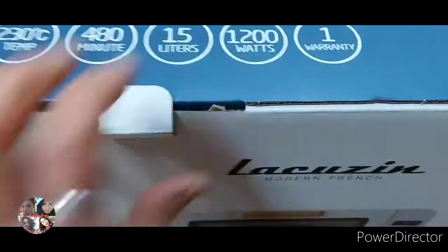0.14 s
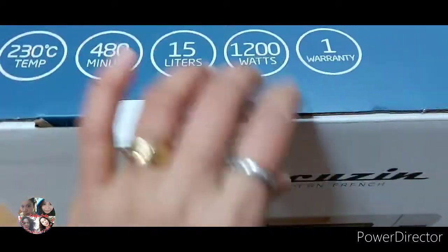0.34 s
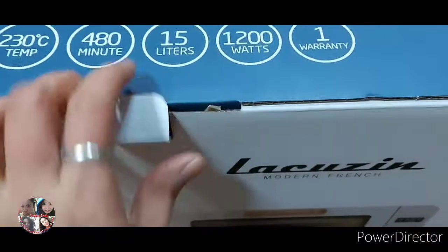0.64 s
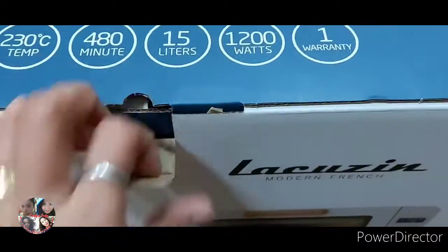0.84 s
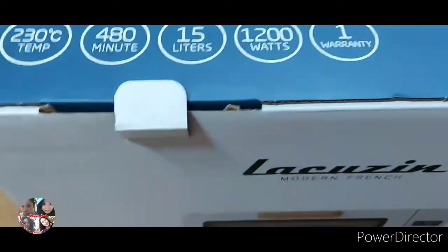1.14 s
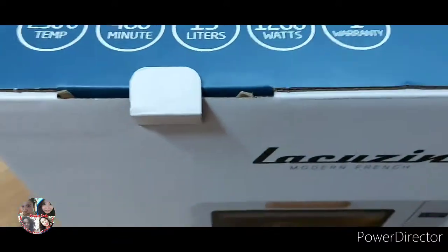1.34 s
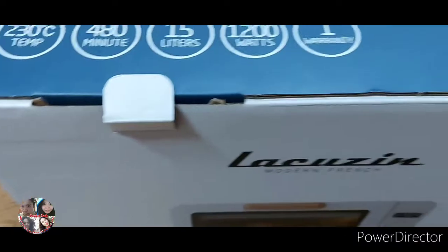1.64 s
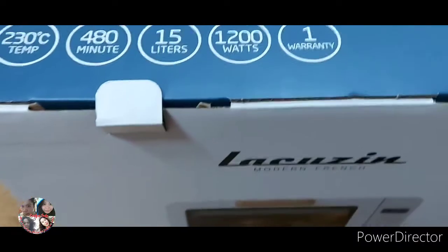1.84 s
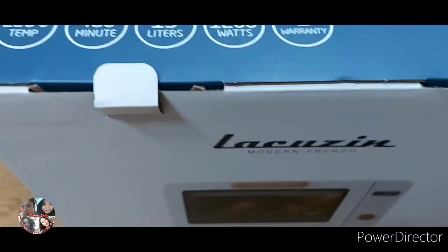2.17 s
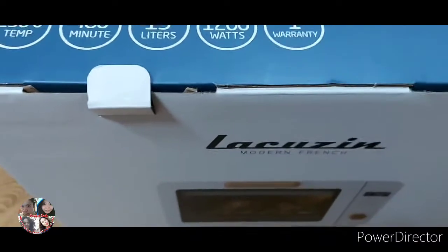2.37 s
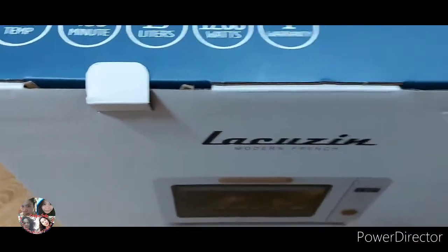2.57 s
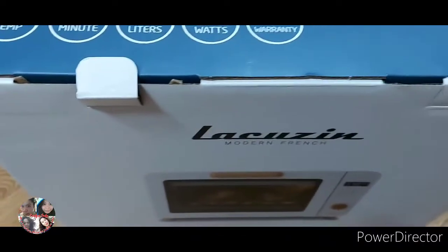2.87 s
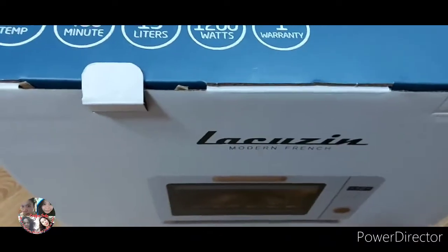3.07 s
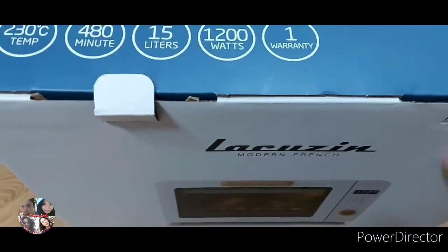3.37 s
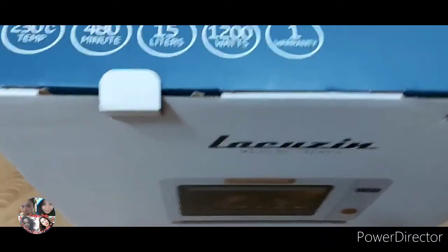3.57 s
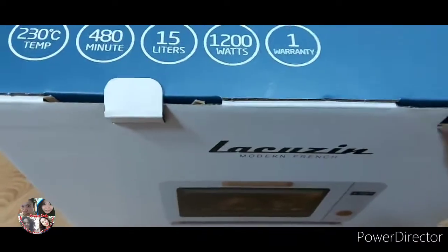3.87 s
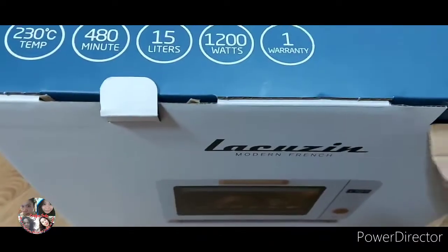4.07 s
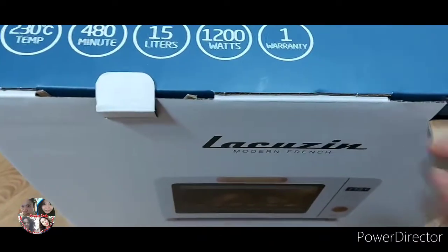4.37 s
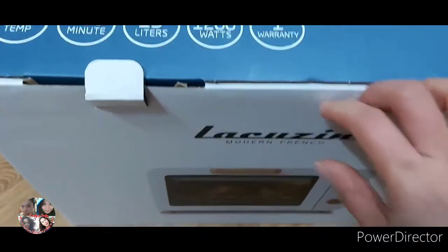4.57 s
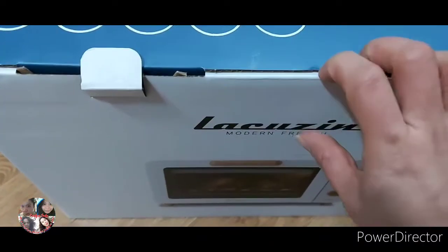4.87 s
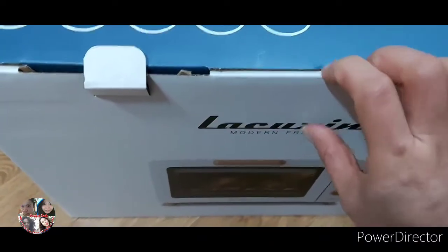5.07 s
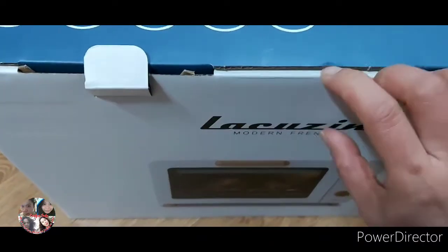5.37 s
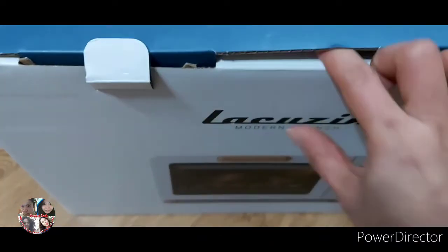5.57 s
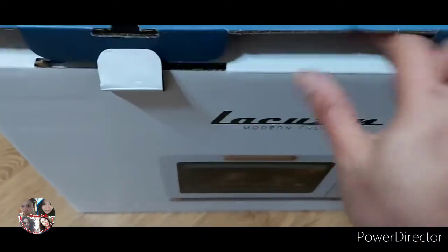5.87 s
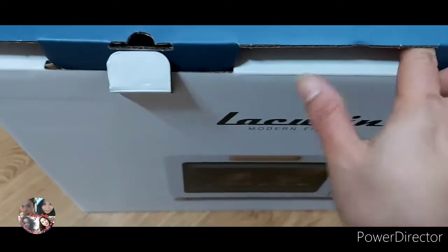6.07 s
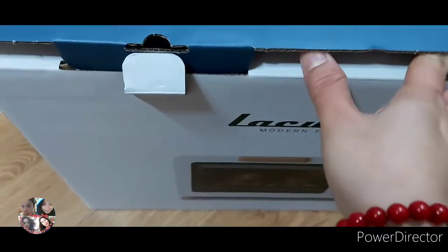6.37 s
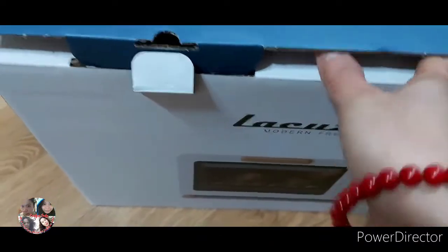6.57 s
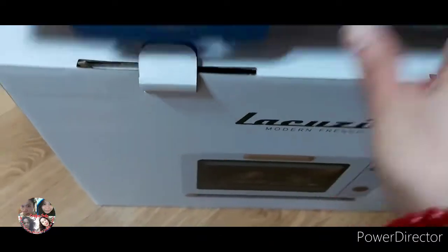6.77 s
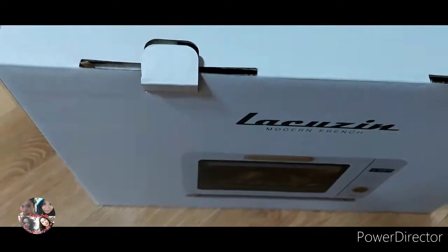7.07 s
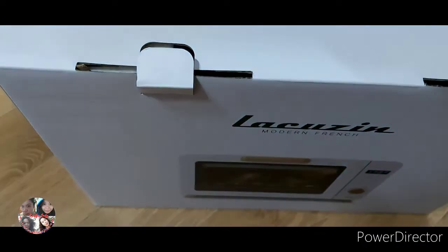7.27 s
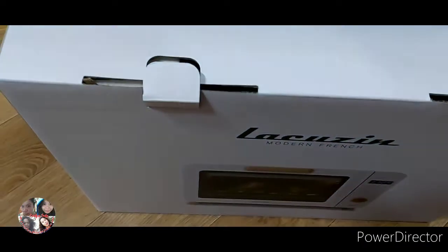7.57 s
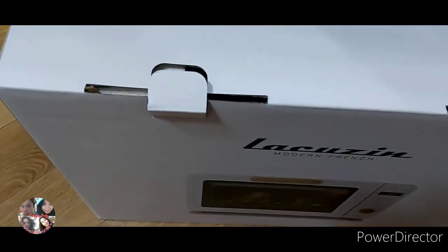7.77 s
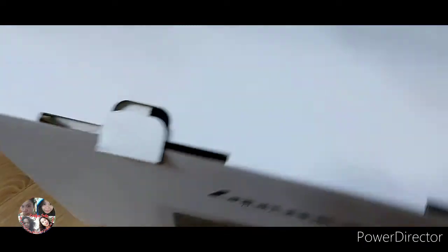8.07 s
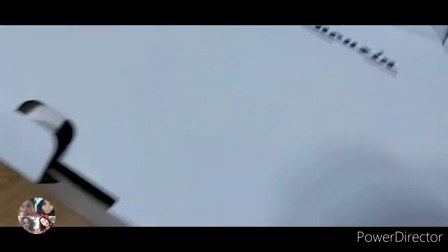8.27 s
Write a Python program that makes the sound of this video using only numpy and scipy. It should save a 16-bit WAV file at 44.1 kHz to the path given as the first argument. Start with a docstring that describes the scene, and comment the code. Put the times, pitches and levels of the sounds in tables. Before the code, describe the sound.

Close, irregular scraping, rustling and hollow knocks of a cardboard box being opened, with sharp snaps as its tabs come loose.

```python
"""A hand scrapes and knocks on a large corrugated cardboard box, close by in a small room.
Two locking tabs are prised out and snap free, then the lid is pulled up and its flap drags along a wall.
Sliding card hisses in tiny slips; coarser stick-slip shakes the panels and rings the hollow box.
Each snap is a volley of breaking fibres that also knocks the panel and thumps the box."""
import sys
import numpy as np
from scipy import signal
from scipy.fft import rfft, irfft
from scipy.io import wavfile

SR = 44100
rng = np.random.default_rng(int(sys.argv[2]) if len(sys.argv) > 2 else 0)


def log_audio(samples):
    """Write samples as a 16-bit WAV file to the path given in sys.argv[1]."""
    # one column per channel
    frames = np.atleast_2d(samples).T
    # limit to full scale, then quantise
    limited = np.clip(frames, -1, 1)
    pcm = np.round(limited * 32767).astype(np.int16)
    wavfile.write(sys.argv[1], SR, pcm)


N = 371763
TIME = np.arange(N) / SR
TOP_HZ = 15700


def undb(db):
    return 10 ** (np.asarray(db) / 20)


def unit_rms(x):
    return x / np.sqrt(np.mean(x ** 2))


def unit_energy(x):
    return x / np.sqrt(np.mean(np.sum(x ** 2, axis=-1)))


def curves(table):
    """Rows of (time [s], values...) to one per-sample curve per value."""
    times, *columns = np.transpose(table)
    return [np.interp(TIME, times, column) for column in columns]


def on_log_axis(hz, points):
    """Interpolate (frequency [Hz], value) rows over log frequency."""
    f, value = np.transpose(points)
    return np.interp(np.log(hz + 1), np.log(f), value)


def response(spectrum, size=4096):
    """Minimum-phase impulse response of a spectrum."""
    gain = undb(on_log_axis(np.fft.rfftfreq(size, 1 / SR), spectrum))
    cepstrum = irfft(np.log(gain))
    cepstrum[1:size // 2] *= 2
    cepstrum[size // 2 + 1:] = 0
    return unit_energy(irfft(np.exp(rfft(cepstrum))))


def through(x, ir):
    """Convolve, keeping the input length."""
    return signal.fftconvolve(np.atleast_2d(x), np.atleast_2d(ir), axes=-1)[:, :x.shape[-1]]


def band(x, hz, width_hz):
    """One resonance."""
    return signal.lfilter(*signal.iirpeak(hz, hz / width_hz, fs=SR), x)


def zero_phase(x, hz, kind):
    return signal.sosfiltfilt(signal.butter(2, hz, kind, fs=SR, output="sos"), x)


def blend(a, b, db):
    """Constant-power mix, b above a by db."""
    return (unit_rms(a) + undb(db) * unit_rms(b)) / np.sqrt(1 + undb(2 * db))


def wander(rate_hz):
    """Slow random curve, spread near 1."""
    knots = rng.standard_normal(N // 50)
    return 1.14 * np.interp(TIME * rate_hz, np.arange(len(knots)), knots)


def pan(db):
    """Constant-power gains, left above right by db."""
    gains = undb(np.array([db, -db]) / 2).reshape(2, -1)
    return gains / np.sqrt(np.mean(gains ** 2, axis=0))


def two_ports(pair, apart_hz=900, bass_side_db=-17):
    """Two unrelated signals as a stereo pair, alike in the bass."""
    treble = zero_phase(pair[1], apart_hz, "high")
    side = treble + undb(bass_side_db) * (pair[1] - treble)
    return np.array([pair[0] + side, pair[0] - side])


def stereo_noise(size):
    return two_ports(rng.standard_normal((2, size)))


def add(out, at_s, sound):
    start = max(int(at_s * SR), 0)
    out[:, start:start + sound.shape[1]] += sound[:, :N - start]


# Room background: (frequency [Hz], density [dB])
ROOM_TONE_SPECTRUM = [(20, -28.5), (45, -9.5), (70, 2), (120, -11.5), (175, 0.5), (290, -7.5), (400, -10),
                      (600, -12), (1000, -13.5), (1800, -24.5), (6000, -14), (15500, -26.5)]
def room_tone(level_db=-69):
    """Faint steady noise of the room."""
    return undb(level_db) * unit_rms(through(stereo_noise(N), response(ROOM_TONE_SPECTRUM)))


# Slides of skin or card over card, before the trims in sliding() and rubbing(): (start [s], swell [s],
# hold [s], hiss [dB], brightness [dB], panel rub [dB], hardness [dB], flex [dB], left-right [dB])
SLIDES = [ (0.0, 0.015, 0.013, -34, 1.5, -29.5, -1, -32, -1.5),
          (0.197, .02, 0.56, -80, 0.5, -75.5, 1, -68, -8.5),
          (0.674, .02, .05, -57, 2, -55.5, -7, -68.5, -1),
          (0.732, .03, .04, -53.5, -2, -55.5, 1.5, -69, -1),
          (0.805, 0.069, 0.024, -45, -4, -38.5, -1.5, -46, -1),
          (0.91, .015, 0.069, -47, -4, -45, 2.5, -58, -3), (1.005, .015, .06, -44.5, 4, -46, 3, -44, -1),
          (1.34, 0.05, 0.12, -58.5, 4, -67.5, -3, -60, 1),
          (1.511, .04, 0.092, -57, -1, -60.5, -8.5, -59, -0.5),
          (1.642, 0.061, .1, -50, 6, -63.5, 9, -61.5, 6), (1.808, 0.048, 0.1, -50.5, 7, -69.5, 10, -62, 6),
          (1.956, 0.017, .02, -51, 2.5, -59.5, -9, -53.5, 4),
          (2.08, .05, 0.064, -51.5, 2.5, -63.5, 3.5, -53, 0),
          (2.172, 0.021, 0.15, -60.5, 6, -59, 7.5, -58.5, -6),
          (2.4, 0.1, 0.065, -57.5, 4.5, -61, -3, -53.5, -7), (2.598, 0.049, .03, -66, 7, -68, 4, -66, 3.5),
          (2.72, .16, .06, -62.5, 14.5, -70.5, 10, -76, 6),
          (2.945, 0.011, 0.061, -56.5, 3.5, -56.5, -2.5, -52.5, 2.5),
          (3.016, 0.097, 0.099, -62, 0.5, -75, -3, -80, 5),
          (3.165, .015, .015, -72, 4, -55.5, -9.5, -65, 2),
          (3.256, 0.032, 0.054, -48.5, -14, -49, 3, -60, 0),
          (3.33, 0.011, 0.055, -47, -15, -46, 0.5, -46.5, -2),
          (3.41, 0.017, .015, -43, -4, -41.5, 1, -47, 0), (3.447, 0.013, .06, -48.5, 0, -47.5, 3, -53.5, 1),
          (3.524, .012, 0.037, -30, 4, -27.5, -4.5, -38, 0),
          (3.711, .02, 0.0063, -48.5, 2, -58, -10, -65, 3.5),
          (3.851, 0.018, 0.006, -42.5, 3.5, -45.5, -8.5, -56, 2),
          (3.944, 0.013, .04, -48, 7, -49.5, 3.5, -44, 2), (4.008, 0.03, .015, -43, 1.5, -48.5, -5, -68, 2),
          (4.075, 0.023, .1, -56.5, 1, -55, -2.5, -57, 4),
          (4.187, 0.013, .015, -65, -1, -40.5, -13.5, -46, 5),
          (4.234, 0.028, .004, -43.5, 1, -43.5, 2.5, -69, -0.5),
          (4.431, 0.056, .015, -49.5, 15, -59, 1.5, -73.5, 5.5),
          (4.53, 0.034, .08, -60, 3, -76, -4.5, -80, 1), (4.697, .03, 0.034, -56, 1, -51.5, 3, -60, 8),
          (4.802, .04, 0.014, -50, 8.5, -54, 0.5, -72, 7),
          (4.897, .025, .025, -60, -2.5, -60, -2.5, -66, 2),
          (4.961, .03, .16, -81, 13, -66, -8, -73.5, 10.5), (5.19, .05, .03, -84, 0.5, -59, -18, -76.5, 4),
          (5.281, 0.016, 0.015, -60, 0, -47.5, -4.5, -51, 3),
          (5.35, .025, 0.0057, -54, 6, -54.5, -11, -52, 7), (5.468, 0.14, .13, -41.5, 2, -43.5, 1, -51, 4),
          (5.592, .05, 0.03, -42.5, -11, -36.5, -1, -47.5, 0),
          (5.728, .02, .02, -35.5, 2.5, -44.5, -0.5, -53, 0),
          (5.855, .008, 0.045, -42.5, -10, -32, -7, -52, -5),
          (5.912, .025, 0.03, -24.5, 4, -27.5, -1, -35, 2.5),
          (5.995, 0.016, .055, -41, 2, -38, -2.5, -52, 4), (6.15, .012, 0.035, -44, 4, -41, -0.5, -52, 5),
          (6.194, .02, 0.076, -49, 2, -47, -3, -48.5, 1.5), (6.31, 0.017, .005, -47.5, 1, -46.5, 3, -48, 3),
          (6.41, 0.023, 0.018, -49.5, 0, -45, -4.5, -53, 5),
          (6.49, .015, 0.023, -49.5, -1, -49.5, 10, -55, 3),
          (6.548, 0.023, .01, -49.5, 2, -50.5, 11, -59, 6),
          (6.623, 0.034, 0.017, -46, -1.5, -48, 4.5, -56, 3),
          (6.707, 0.062, 0.018, -50, 10.5, -53, -1, -54.5, 4),
          (6.833, 0.042, 0.031, -34.5, 3, -35.5, 0.5, -55, 1.5),
          (6.917, 0.026, .055, -33.5, 3.5, -44.5, -2, -46.5, 1),
          (7.072, .03, 0.042, -35, 3.5, -35.5, 3.5, -35, 1), (7.225, 0.05, .01, -36, 4.5, -38.5, 1, -57, 2),
          (7.361, 0.026, 0.0056, -42, 11, -40, -1, -48, 2), (7.432, 0.055, .03, -46, 8, -54, 2.5, -55, 1),
          (7.503, 0.032, 0.046, -37, 9.5, -35.5, -0.5, -39.5, -1),
          (7.587, 0.077, .035, -36, 6, -47.5, 3, -51, -0.5),
          (7.78, 0.016, .005, -36, 8.5, -42.5, -2.5, -53, 0),
          (7.829, 0.012, 0.068, -37, 10, -43.5, 4, -58, 1),
          (7.968, 0.015, 0.019, -43, 7, -40.5, 5.5, -58.5, -1),
          (7.992, 0.027, 0.23, -44.5, 8, -46.5, 4.5, -49, 1),
          (8.091, 0.098, 0.044, -32.5, 7, -43.5, 5.5, -54, 4),
          (8.223, .06, .14, -30, -0.5, -38, 3.5, -40.5, 2)]
def slide_controls(swell_power=0.89, sag_db_per_s=12.5, release_db_per_s=301):
    """Each slide gathers speed, tires and stops; in overlaps the louder sets colour and side."""
    t = TIME[::64]
    columns = np.transpose(SLIDES)[:, :, None]
    start_s, swell_s, hold_s, hiss_db, bright_db, rub_db, hard_db, flex_db, pan_db = columns
    held_s = np.maximum(t - start_s - swell_s, 0)
    drop_db = sag_db_per_s * held_s + release_db_per_s * np.maximum(held_s - hold_s, 0)
    speed = np.clip((t - start_s) / swell_s, 0, 1) ** swell_power * undb(-drop_db)

    def combine(level_db, *colours):
        power = (speed * undb(level_db)) ** 2 + 1e-14
        total = power.sum(0)
        means = [(power * colour).sum(0) / total for colour in colours]
        return curves(np.transpose([t, 10 * np.log10(total), *means]))
    return combine(hiss_db, bright_db, pan_db), combine(rub_db, hard_db) + combine(flex_db)


def slips(rate_hz, spread_db):
    """Irregular slips of very uneven size, on two channels."""
    happens = rng.random(N) < rate_hz / SR
    sizes = undb(spread_db * np.minimum(rng.exponential(size=N), 4))
    return unit_rms(happens * sizes * rng.standard_normal((2, N)))


def snag_gain(rate_hz, spread_db, fade_s, db):
    """Gain of a steady rub plus brief spurts as the card snags and releases."""
    spurt = np.exp(-np.arange(256) / SR / fade_s)
    power = through(slips(rate_hz, spread_db)[0] ** 2, spurt)
    return np.hypot(1, undb(db) * unit_rms(np.sqrt(abs(power))))


def flicker(x, depth_db, rate_hz, octaves=5):
    """Each octave wavers on its own as the contact patch changes."""
    out, rest = 0, x
    for hz in TOP_HZ / 2. ** np.arange(octaves, 0, -1):
        low = zero_phase(rest, hz, "low")
        out = out + low * undb(depth_db * wander(rate_hz))
        rest = rest - low
    return out + rest * undb(depth_db * wander(rate_hz))


def flap_bounces(x, db, fade_s, move_hz=14.0, count=4, size=2048):
    """Add early bounces off flaps and walls; the pattern shifts as the contact moves."""
    fade = np.exp(-np.arange(size) / SR / fade_s)
    paths = [through(x, unit_energy(stereo_noise(size) * fade)) for _ in range(count)]
    shares = np.array([wander(move_hz) for _ in range(count)])
    shares = shares / np.sqrt(np.sum(shares ** 2, axis=0))
    return x + undb(db) * sum(share * path for share, path in zip(shares, paths))


# Fibre hiss: (frequency [Hz], density [dB])
HISS_SPECTRUM = [(600, -41.5), (1400, -5.5), (2000, -5.5), (2800, -0.5), (4000, 0.5), (5500, 0.5),
                 (8000, -0.5), (11000, -1), (15500, -4)]
def sliding(level_db, bright_db, pan_db, catch_db=1.48, catch_hz=70, split_hz=5500):
    """Paper fibres brush past each other; the contact catches and lets go."""
    contact = rng.standard_normal((2, N))
    contact *= snag_gain(rate_hz=930, spread_db=2.5, fade_s=0.00072, db=-1.5)
    contact = flicker(two_ports(contact), depth_db=2.5, rate_hz=45)
    contact *= undb(catch_db * wander(catch_hz))
    hiss = flap_bounces(through(contact, response(HISS_SPECTRUM)), db=1.0, fade_s=0.0024)
    dull = zero_phase(hiss, split_hz, "low")
    return blend(dull, hiss - dull, bright_db) * undb(level_db - 1.0) * pan(pan_db + 1.9)


# Modes of the hollow box: (frequency [Hz], width [Hz], gain [dB])
BOX_MODES = [(169, 22, -7), (319, 11, -8), (385, 40, 5.5), (600, 30, -5.5), (697, 84, 3), (786.6, 43, 0.5),
             (1033, 24, -8), (1107, 45, -10.5), (1373, 59, -2.5), (1680, 36, -12)]
def rubbed_box(x, waver_db=5.5, waver_hz=6.4):
    """Each mode takes more or less of the rub as the contact crosses the panel."""
    return sum(undb(db + waver_db * wander(waver_hz)) * band(x, hz, width_hz)
               for hz, width_hz, db in BOX_MODES)


def struck_box(size=4096):
    """Impulse response of the damped box modes."""
    t = np.arange(size) / SR
    modes = (undb(db) * width_hz * np.exp(-np.pi * width_hz * t) * np.cos(2 * np.pi * hz * t)
             for hz, width_hz, db in BOX_MODES)
    return unit_energy(sum(modes))


# Finger pad on card: (frequency [Hz], density [dB])
PAD_SPECTRUM = [(110, -35.5), (180, 3.5), (300, 1.5), (390, 2), (500, -6), (700, -18.5), (1500, -51)]
# Nail or cut edge on card: (frequency [Hz], density [dB])
EDGE_SPECTRUM = [(300, -30.5), (560, 0.5), (750, 3.5), (1050, -2), (1400, -4.5), (1800, -7), (2600, -12.5),
                 (8000, -54.5)]
# Hollowness of the rub: (time [s], box ring re panel shake [dB])
HOLLOWNESS = [(0, -12), (1.8, -24), (2.3, -1.5), (3.3, -9), (4.3, 11), (5.15, 12), (5.65, -1.5), (5.9, 18),
              (6.3, 3.5), (6.9, -10.5), (8.4, -18)]
# Rumble of the flexing box: (frequency [Hz], density [dB])
FLEX_SPECTRUM = [(18, -32.5), (35, -15.5), (58, 1), (80, 4), (115, -1), (170, -3.5), (240, -18), (400, -33),
                 (1500, -45)]
def rubbing(rub_db, hard_db, flex_db, grain_db=-2.0, catch_db=2.5, catch_hz=45):
    """Coarse stick-slip shakes the panels and rings the box, which flexes and rumbles."""
    contact = rng.standard_normal((2, N)) + undb(grain_db) * slips(rate_hz=350, spread_db=3.0)
    contact = two_ports(contact) * undb(catch_db * wander(catch_hz))
    # the cut edge jumps over the flutes
    rasp = unit_rms(snag_gain(rate_hz=110, spread_db=3.5, fade_s=0.0012, db=-5.0))
    contact = flap_bounces(contact * rasp, db=-6.0, fade_s=0.005)
    pad = through(contact, response(PAD_SPECTRUM))
    edge = through(contact, response(EDGE_SPECTRUM))
    shake = blend(pad, edge, hard_db)
    panels = blend(shake, rubbed_box(shake), curves(HOLLOWNESS)[0])
    push = rng.standard_normal(N) + undb(-6.5) * rng.standard_normal((2, N))
    rumble = unit_rms(through(push, response(FLEX_SPECTRUM))) * np.hypot(undb(flex_db), wall_sways())
    return panels * undb(rub_db - 1.0) * pan(0.9) + rumble * pan(2.1)


# Breaking fibres: (frequency [Hz], density [dB])
CRACK_SPECTRUM = [(500, -12), (1300, 1), (2200, -1), (3500, -4.5), (5500, -3.5), (7500, -6.5), (11000, -5),
                  (15500, 0)]
# Knocked panel: (frequency [Hz], density [dB])
PANEL_SPECTRUM = [(100, -23.5), (220, 8), (400, 0.5), (750, -0.5), (1100, 1), (1600, -3.5), (3000, -7),
                  (8000, -43.5)]
# Thumped box: (frequency [Hz], density [dB])
THUD_SPECTRUM = [(20, -36), (38, -22), (58, -9), (90, -4), (125, -7.5), (175, 4), (280, -3.5), (450, -24),
                 (2000, -62.5)]
# Snaps, creases and bumps: (time [s], fade [ms], crack [dB], crack pitch [Hz], knock [dB],
# knock pitch [Hz], thud [dB], crack left-right [dB])
BLOW_EVENTS = [(0.012, 2.2, -58, 5500, -34, 350, -27.5, 0), (0.0234, 2.2, -24.5, 4870, -27, 900, -34, -1.5),
               (0.029, 7.2, -44, 4600, -25.5, 950, -34, 7), (0.208, 1, -53, 4050, -54.5, 460, -88, -16),
               (0.8133, 5.7, -39.5, 7500, -37, 273, -37.5, -4), (0.8513, 4, -40.5, 3880, -45, 557, -48, -2),
               (0.871, 3.5, -37.5, 3380, -42.5, 546, -50, 7), (0.9185, 6.2, -39, 7000, -40.5, 300, -59, -1),
               (1.009, 4.2, -28.5, 6170, -29.5, 844, -63, 0), (1.064, 2.5, -42.5, 5920, -42, 398, -57, 2.5),
               (1.0798, 4.2, -34, 5730, -27, 760, -35.5, 14.5),
               (1.0841, 3.2, -24, 5440, -42.5, 710, -45, -1),
               (1.3389, 1.2, -51.5, 4400, -55.5, 363, -53.5, -12),
               (1.913, 1.1, -52, 5900, -57, 890, -72, -2), (1.969, 0.59, -47, 5200, -57, 960, -65, 4),
               (2.144, 2, -49, 4930, -53.5, 380, -52, -10), (2.178, 1.9, -51.5, 4000, -55, 500, -66, -4),
               (2.548, 2.5, -57, 4500, -57.5, 453, -54, 13), (2.6132, 1, -55, 6100, -64, 400, -60, 13),
               (3.2427, 9.9, -48, 6500, -55, 736, -65, 7), (3.2703, 5.7, -45, 3550, -50, 610, -70, 5),
               (3.322, 2.5, -45, 4940, -49.5, 600, -61, 2.5), (3.336, 0.8, -27, 6460, -47, 434, -61, 5),
               (3.401, 3.1, -38, 4400, -39.5, 690, -64, 2), (3.376, 2, -43, 7100, -53.5, 701, -65, 7.5),
               (3.4225, 1.1, -34, 7540, -43, 880, -63, 12), (3.448, 2, -42.5, 6000, -50.5, 700, -62, 9.5),
               (3.505, 4.1, -24.5, 7750, -44, 920, -62, 9), (3.5417, 5.5, -16.5, 6580, -26.5, 426, -38, 5),
               (3.554, 8.3, -46, 6100, -29, 332, -27, -7), (3.9502, 2.4, -47.5, 6900, -46, 320, -33.5, 5),
               (4.082, 5.3, -58, 5400, -45.5, 650, -49, 3), (4.201, 1.3, -71, 5800, -61, 340, -36.5, 7),
               (4.277, 2.9, -36.5, 8700, -49, 970, -64, 16), (4.731, 2.8, -58, 5200, -48.5, 576, -59, 15),
               (4.824, 4.2, -53.5, 6820, -54, 680, -76, 17), (5.2774, 5.7, -51, 6160, -45, 470, -42.5, 10),
               (5.2847, 2.7, -50.5, 6100, -42.5, 400, -43.5, 8),
               (5.7518, 4.2, -31.5, 6900, -53, 530, -53, 18), (5.852, 3.9, -21, 6050, -22, 620, -62, 16),
               (5.93, 10, -19, 3440, -25.5, 1130, -39, 4), (5.971, 5, -37, 5750, -26, 760, -30.5, 4),
               (6.072, 1.3, -47, 4800, -37.5, 500, -51, 5), (6.333, 3, -50, 6500, -48, 790, -56, 6),
               (6.428, 7, -45.5, 6840, -49.5, 370, -43, 18), (6.445, 3, -51, 3300, -38.5, 910, -50, 13),
               (6.4922, 3.1, -46.5, 3270, -32, 775, -70, 25), (6.575, 2.3, -48.5, 4300, -62, 840, -51, -4),
               (6.9018, 5.4, -23, 9000, -38, 640, -36.5, 8), (7.097, 22, -29, 5060, -58, 740, -33, 8),
               (7.305, 5.1, -34, 7100, -45.5, 590, -45, 5), (7.528, 1.8, -62, 5900, -40, 330, -33.5, -3),
               (7.579, 5.8, -58, 8400, -43, 320, -33.5, 3), (7.74, 4.9, -42, 6030, -26.5, 305, -27.5, 4),
               (7.978, 1.3, -40.5, 4550, -46, 644, -55, 2), (8.384, 2.2, -25, 7400, -39, 695, -44, 1),
               (8.392, 2.1, -36, 7000, -37.5, 776, -36.5, -8)]
def blows(snap_s=0.0006, fibre_rate_hz=1000, later_db=-4, fuzz_db=-12, ring_db=-10, size=6144):
    """Fibres break in a quick volley; the same blow knocks the panel and thumps the box."""
    out, t = np.zeros((2, N)), np.arange(size) / SR
    crack_ir, panel_ir, thud_ir = map(response, (CRACK_SPECTRUM, PANEL_SPECTRUM, THUD_SPECTRUM))
    ring_ir = struck_box()
    snap = t / snap_s * np.exp(1 - t / snap_s)
    for at_s, fade_ms, crack_db, crack_hz, knock_db, knock_hz, thud_db, pan_db in BLOW_EVENTS:
        age = t * 1000 / fade_ms
        fade = np.exp(-age)
        breaks = rng.random(size) < fibre_rate_hz / SR
        volley = (t == 0) + undb(later_db) * breaks * rng.standard_normal(size) * fade
        fuzz_power = fade_ms * (undb(fuzz_db) * fade) ** 2
        envelope = np.sqrt(abs(through(volley ** 2, snap ** 2)) + fuzz_power)
        bursts = envelope * rng.standard_normal((2, size))
        crack = unit_energy(through(band(bursts, crack_hz, 0.58 * crack_hz), crack_ir))
        push = volley + 0.13 * fade * stereo_noise(size)  # the flap lies differently to each port
        knock = unit_energy(through(band(push, knock_hz, 0.53 * knock_hz), panel_ir))
        knock = knock + undb(ring_db) * unit_energy(through(knock, ring_ir))
        thud = unit_energy(through(fade * np.cos(np.pi * age / 4), thud_ir))
        blow = undb(crack_db) * crack * pan(pan_db) + undb(knock_db) * knock + undb(thud_db) * thud
        add(out, at_s, blow)
    return np.sqrt(SR / 100) * out  # unit energy to unit rms over 10 ms


# Scuffs, squeaks and groans: (peak time [s], level [dB], centre [Hz], width per filter pass [Hz],
# swell [s], fade [s])
SCUFF_EVENTS = [(.49, -52, 4020, 3150, .006, 0.027), (1.441, -61.5, 2800, 3500, 0.07, 0.095),
                (1.537, -55, 4200, 900, .002, 0.018), (2.135, -48, 4350, 2200, 0.012, .027),
                (2.26, -65, 870, 500, 0.044, 0.35), (2.529, -61.5, 4470, 2520, .027, 0.055),
                (3.135, -58, 4840, 2000, 0.0079, 0.036), (3.546, -26.5, 2050, 795, .0016, 0.029),
                (3.83, -39.5, 4050, 2380, 0.00035, 0.023), (4.572, -45, 3250, 1200, .0004, 0.029),
                (4.968, -56.5, 6500, 5000, 0.0066, .006), (5.125, -64.5, 6000, 3500, 0.011, .019),
                (5.324, -47, 4340, 2870, .0008, 0.048), (5.378, -49, 5460, 3520, .008, 0.024),
                (6.16, -35, 5250, 3570, 0.0034, 0.02), (6.335, -35.5, 7350, 2500, 0.0016, 0.0031),
                (7.101, -32.5, 2300, 1740, 0.0015, 0.027), (7.275, -35, 1670, 1000, 0.018, 0.016),
                (6.89, -38, 694, 260, 0.019, 0.034), (7.539, -33, 286, 90, 0.018, 0.021),
                (7.56, -44, 1730, 2200, 0.073, 0.043), (8.27, -32.5, 7800, 2200, 0.1, .12)]
def scuffs(size=32768):
    """A fingertip or edge brushes the card: noise around one pitch swells and dies."""
    out, t = np.zeros((2, N)), (np.arange(size) - size // 2) / SR
    for peak_s, db, hz, width_hz, swell_s, fade_s in SCUFF_EVENTS:
        brush = unit_rms(band(band(stereo_noise(size), hz, width_hz), hz, width_hz))
        envelope = np.exp(np.minimum(t / swell_s, -t / fade_s))
        add(out, peak_s + t[0], brush * undb(db) * envelope * pan(2.6))
    return out


# Swells of the rumble: (peak time [s], level [dB])
SWAY_EVENTS = [(0.65, -51.5), (0.715, -47), (0.831, -36.5), (1.57, -46), (2.23, -46), (6.96, -43),
               (7.331, -33), (7.59, -40), (7.769, -31), (7.871, -35.5), (8.04, -38.5)]
def wall_sways(rise_s=0.025, fade_s=0.019):
    """Rumble gain as a whole wall of the box gives way and sways back."""
    return sum(undb(db) * np.exp(np.minimum((TIME - peak_s) / rise_s, (peak_s - TIME) / fade_s))
               for peak_s, db in SWAY_EVENTS)


# Room decay: (frequency [Hz], T60 [s])
ROOM_T60 = [(100, 0.75), (400, 0.24), (1500, 0.32), (5000, 0.24), (14000, 0.23)]
def room_response(build_s=0.00057, size=22050):
    """Diffuse reflections build quickly; the bass lasts longest."""
    t = np.arange(size) / SR
    hz, frame_s, frames = signal.stft(stereo_noise(size), SR, nperseg=256)
    frames = frames * 1000. ** (-frame_s / on_log_axis(hz, ROOM_T60)[:, None])
    tail = signal.istft(frames, SR)[1][:, :size]
    return unit_energy(tail * (1 - np.exp(-(t / build_s) ** 2)))


def scene(blow_send_db=-9.5, friction_send_db=-8.5):
    """Blows and friction, their reflections, and the room tone."""
    hits = blows()
    hiss_controls, rub_controls = slide_controls()
    friction = sliding(*hiss_controls) + rubbing(*rub_controls) + scuffs()
    background = room_tone()
    send = undb(blow_send_db) * hits + undb(friction_send_db) * friction
    return hits + friction + through(send, room_response()) + background


def record(dry, ceiling=0.85):
    """The phone rounds the loudest snaps and cuts the top."""
    rounded = ceiling * np.tanh(dry / ceiling)
    return signal.sosfilt(signal.ellip(8, .2, 80, TOP_HZ, fs=SR, output="sos"), rounded)


dry = scene()
out = record(dry)
log_audio(out)
```